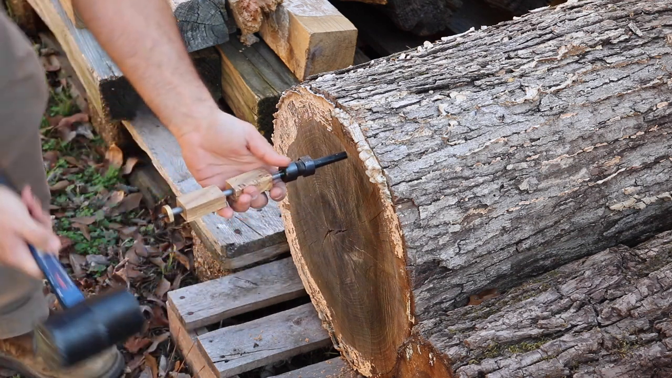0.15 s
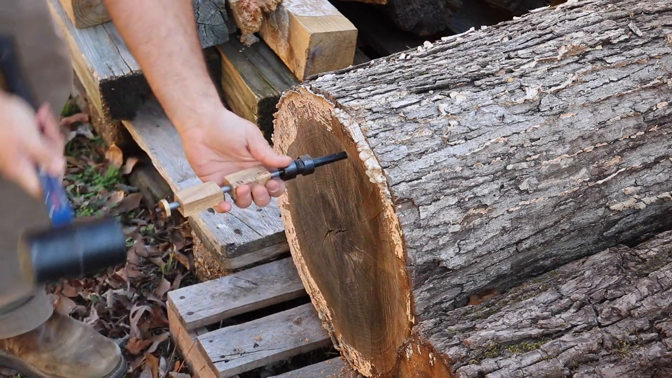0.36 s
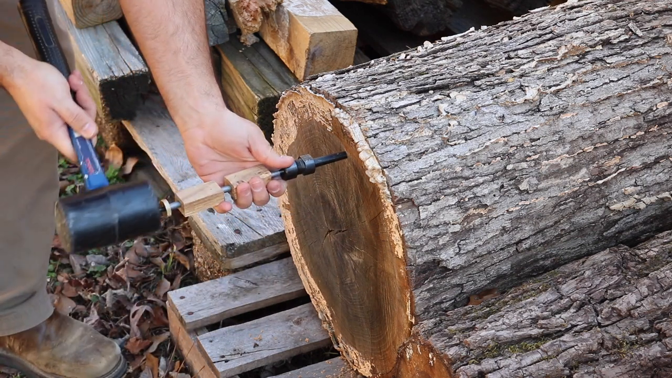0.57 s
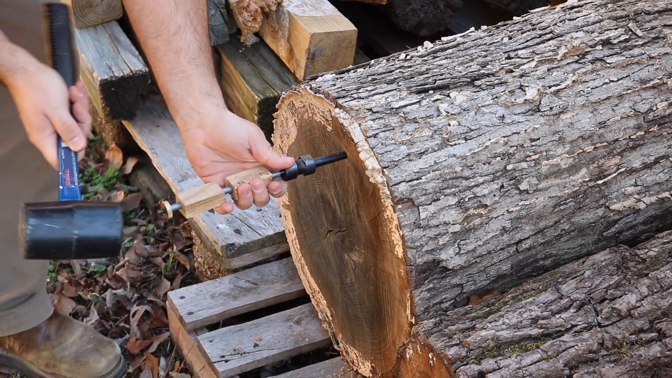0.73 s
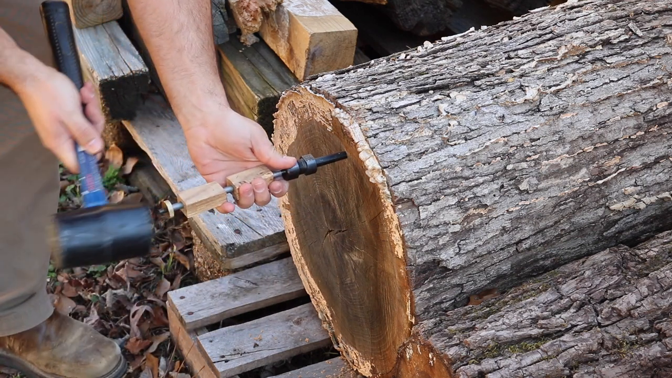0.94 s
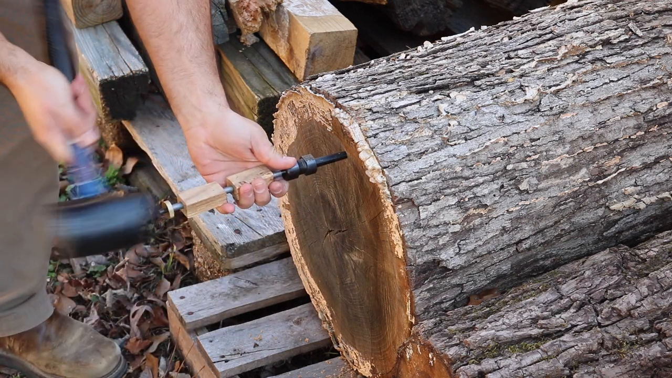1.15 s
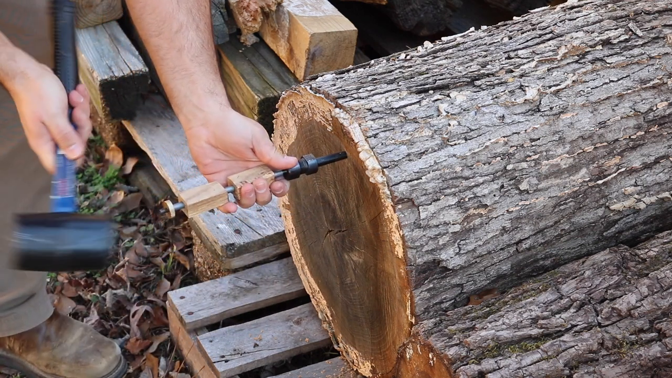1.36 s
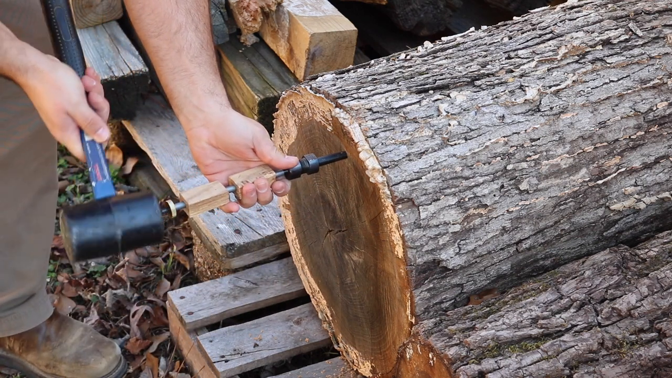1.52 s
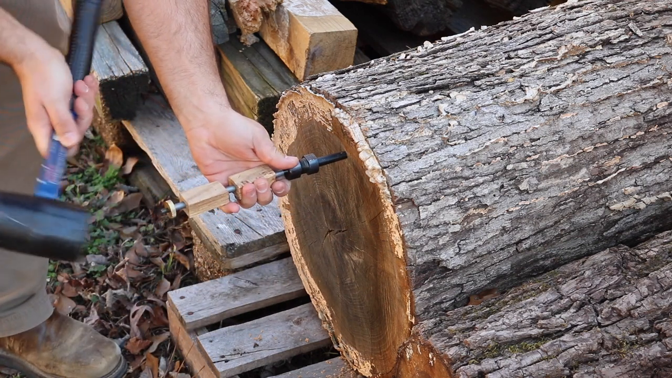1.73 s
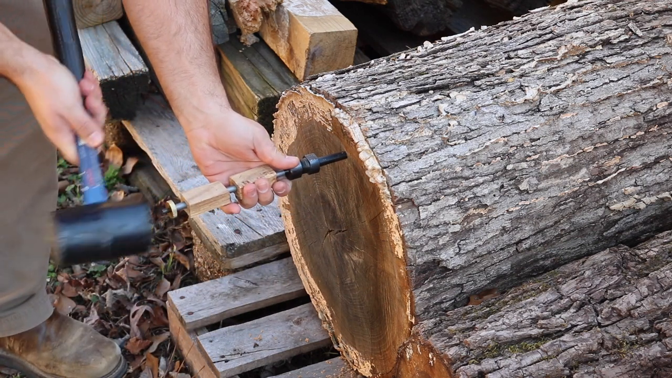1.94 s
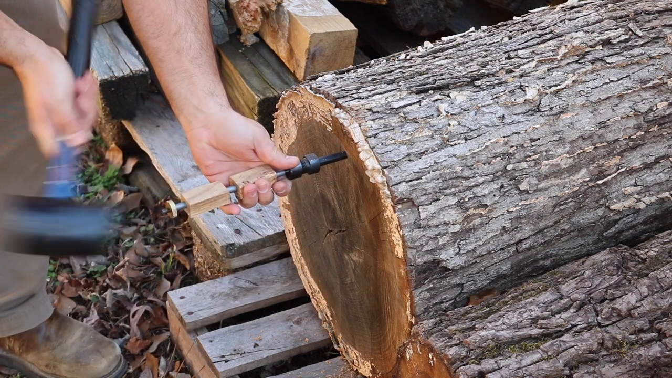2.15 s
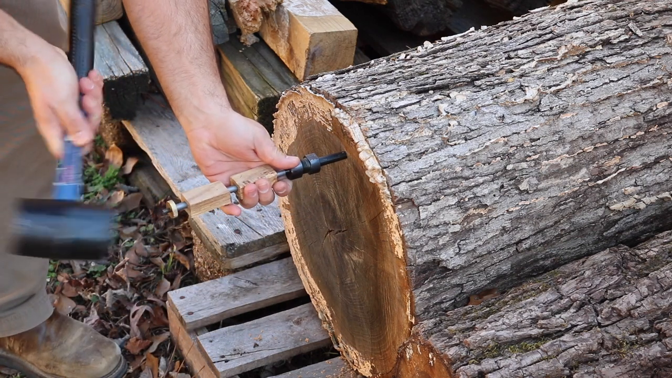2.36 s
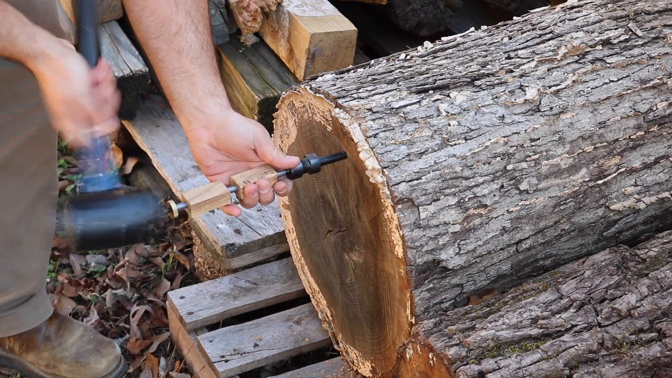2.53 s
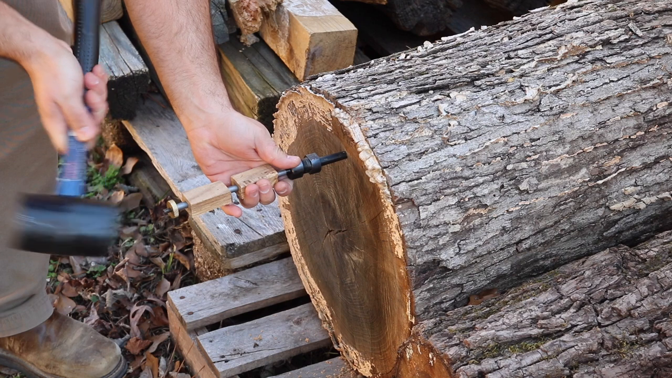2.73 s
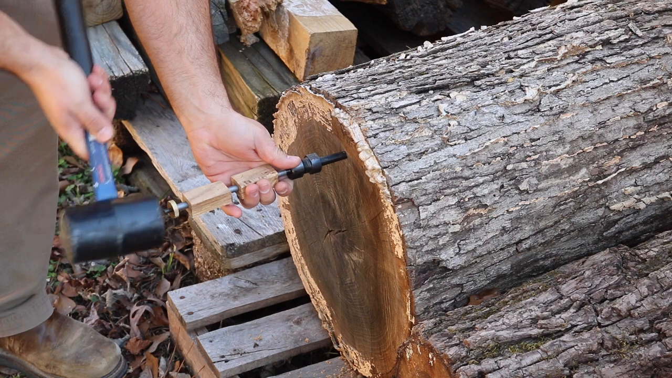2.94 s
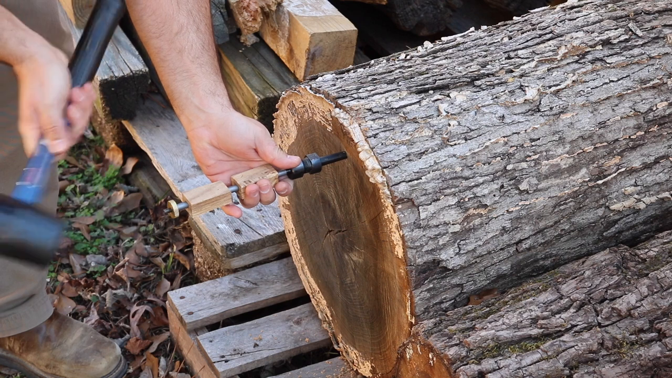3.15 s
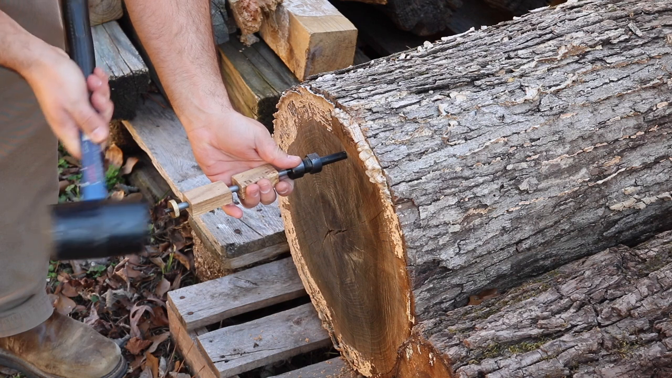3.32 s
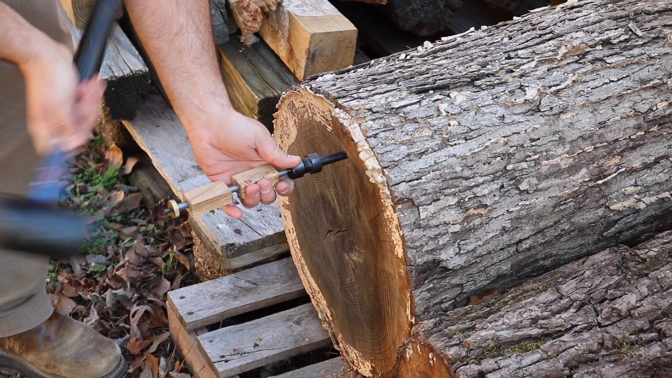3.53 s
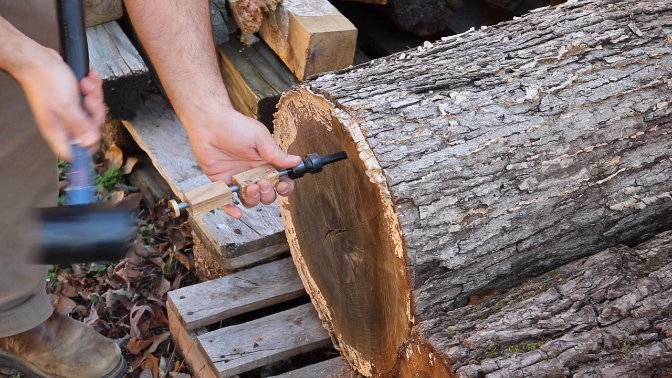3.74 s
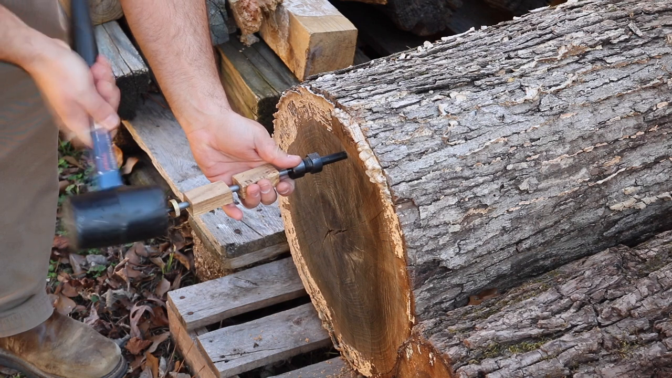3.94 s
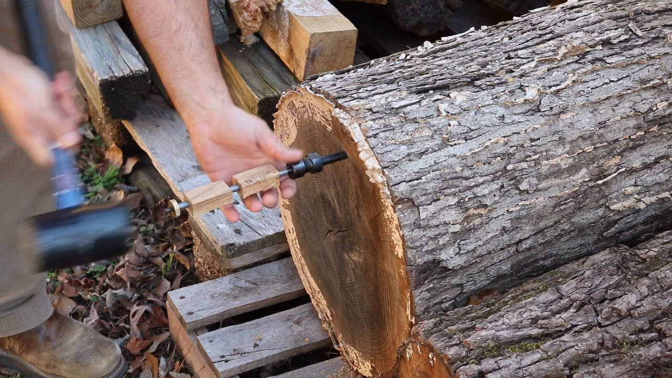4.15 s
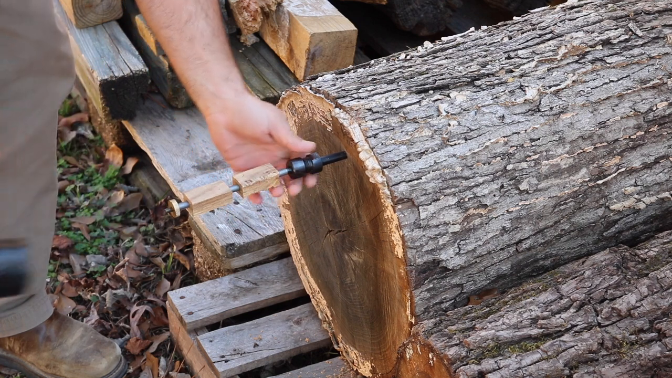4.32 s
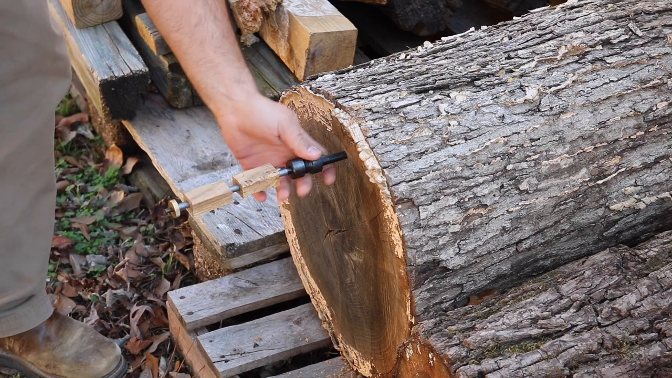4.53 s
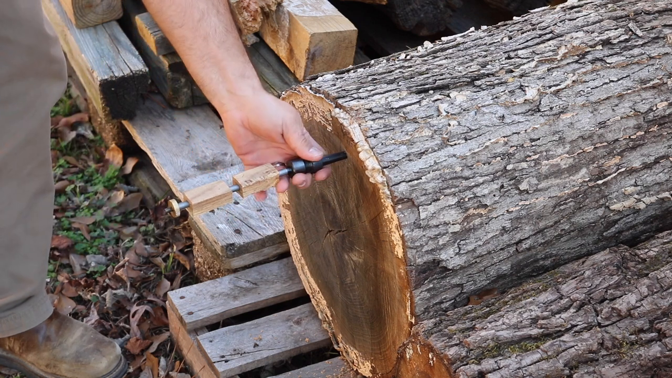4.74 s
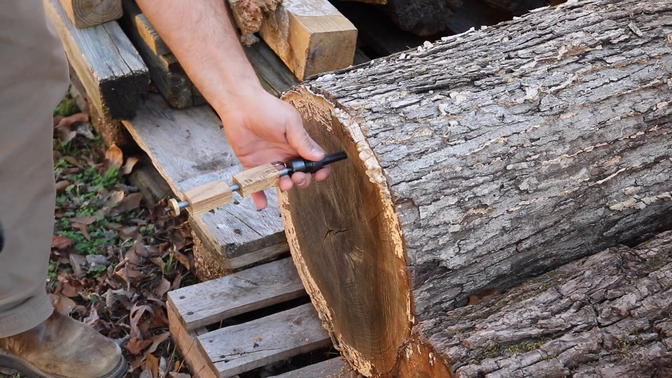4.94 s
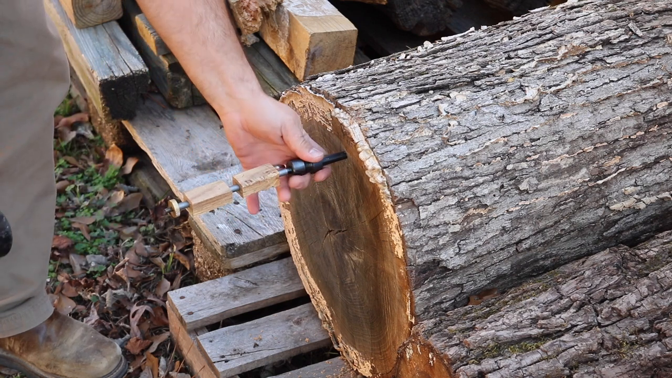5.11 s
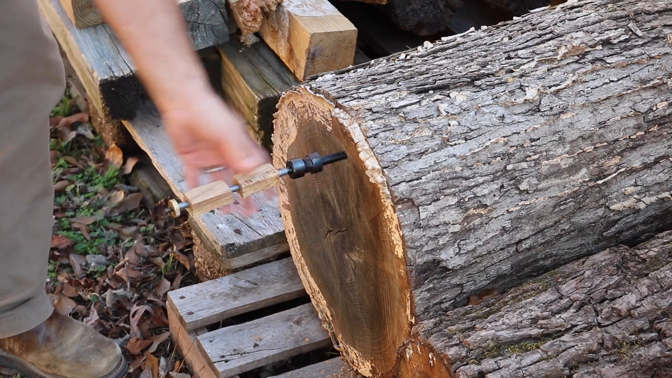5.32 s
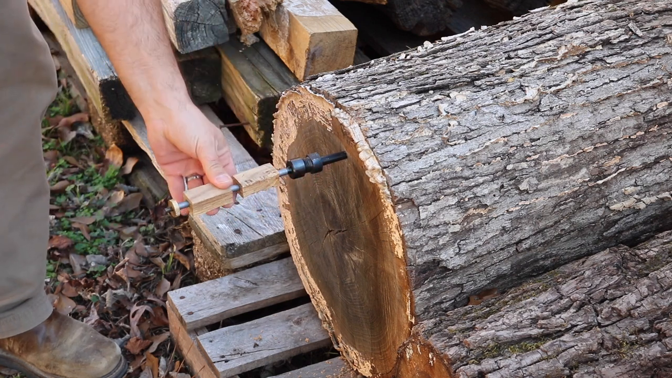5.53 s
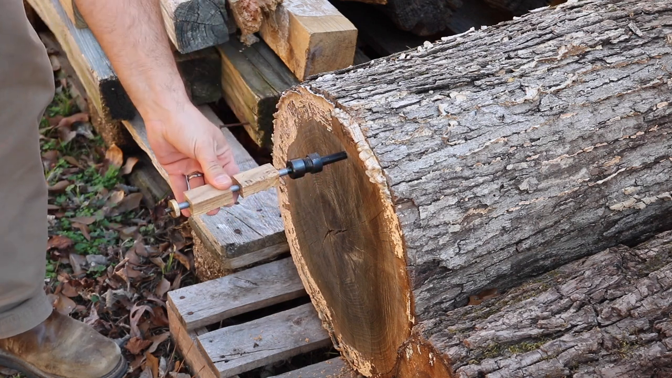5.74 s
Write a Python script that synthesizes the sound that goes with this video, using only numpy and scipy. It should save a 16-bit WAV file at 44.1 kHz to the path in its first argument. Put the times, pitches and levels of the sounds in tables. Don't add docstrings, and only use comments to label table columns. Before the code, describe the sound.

Outdoors, crunching leaves and snapping twigs, then eleven steady mallet knocks drive a steel rod into a log, ending in quiet rustles and faint bird chips.

```python
import sys
import numpy as np
from scipy import signal
from scipy.fft import rfft, irfft
from scipy.io import wavfile
from scipy.ndimage import uniform_filter1d

SR = 44100
rng = np.random.default_rng(int(sys.argv[2]) if len(sys.argv) > 2 else 0)


def to_wav(sig):
    pcm = np.clip(np.atleast_2d(sig), -1, 1) * 32767
    pcm = np.round(pcm).astype(np.int16)
    wavfile.write(sys.argv[1], SR, pcm.T)


def voltage_ratio(decibels):
    exponent = np.asarray(decibels, float) / 20
    return 10 ** exponent


N = 254898


def unit(x):
    return x / np.sqrt(np.mean(x ** 2))


def colour(x, points):
    hz, db = np.transpose(points)
    f = np.maximum(np.arange(len(x) // 2 + 1) * SR / len(x), 1)
    gain = voltage_ratio(np.interp(np.log(f), np.log(hz), db))
    return irfft(rfft(x) * gain, len(x))


def ring(hz, t60, lag=0., length=.5):
    t = np.maximum(np.arange(int(length * SR)) / SR - lag, 0)
    return np.sin(2 * np.pi * hz * t) * 1000. ** (-t / max(t60, .002))


def burst(low_hz, high_hz, t60, length=.5):
    t = np.arange(int(length * SR)) / SR
    band = signal.butter(2, [low_hz, min(high_hz, 18000)], "band", fs=SR, output="sos")
    noise = unit(signal.sosfilt(band, rng.standard_normal(len(t))))
    return noise * 1000. ** (-t / t60)


def add(out, s, sound):
    i = int(s * SR)
    out[i:i + len(sound)] += sound[:N - i]


def walk(rate):
    k = int(SR / rate)
    steps = np.repeat(rng.standard_normal(N // k + 1), k)
    return unit(uniform_filter1d(uniform_filter1d(steps, k), k)[:N])


def body(modes, scatter_db=2.42):
    total = 0
    for hz, db, t60, ms in modes:
        level_chance, pitch_chance = rng.standard_normal(2)
        mode = ring(hz * (1 + pitch_chance / 300), t60, ms / 1000)
        total = total + voltage_ratio(db + scatter_db * level_chance) * mode
    return total


# frequency in Hz, density in dB per Hz.
AIR_SPECTRUM = [(20, -1), (50, -2), (100, 1.5), (200, -5.5), (400, -9), (800, -15.5), (1600, -17.5),
                (2500, -18.5), (3300, -15.5), (4200, -21.5), (8000, -24), (15600, -28.5), (16100, -50)]
# time in seconds, level in dB.
GUST_LEVEL = [(0.0, -62), (0.21, -70), (0.75, -57.5), (1.45, -58), (2.1, -56), (2.4, -63), (3.14, -60),
              (4.0, -69), (4.25, -60), (4.57, -68.5), (5.1, -66.5), (5.78, -58)]


def air():
    s, db = np.transpose(GUST_LEVEL)
    hum = unit(colour(rng.standard_normal(N), AIR_SPECTRUM)) * voltage_ratio(-64 + 0.42 * walk(0.39))
    rumble = [(12, -24), (30, 0), (70, -0.5), (130, -11.5), (300, -41)]
    gust = unit(colour(rng.standard_normal(N), rumble))
    return hum + gust * voltage_ratio(np.interp(np.arange(N) / SR, s, db) - 2.0 + 3.5 * walk(9))


# start in seconds, level in dB, top frequency in Hz.
BIRD_CHIPS = [
    (4.442, -64.5, 6100),
    (4.467, -64, 5930),
    (5.532, -58.5, 6000),
    (5.557, -64.5, 5950),
    (5.638, -70.5, 5800),
    (2.992, -59.5, 6000),
]


def bird():
    out = np.zeros(N)
    u = np.linspace(0, 1, int(.016 * SR))
    for s, db, top_hz in BIRD_CHIPS:
        hz = top_hz * np.interp(u, [0, .3, .55, .68, 1], [.58, .85, 1, .88, .5])
        whistle = np.sin(2 * np.pi * np.cumsum(hz) / SR)
        add(out, s, voltage_ratio(db) * np.sin(np.pi * u) ** .3 * whistle)
    trees = voltage_ratio(-40.0) * burst(5460, 5500, 0.36) + voltage_ratio(-22.5) * burst(2400, 8600, 0.062)
    return out + signal.fftconvolve(out, trees)[:N]


# loudest moment in seconds, level in dB,
# swell and fade in seconds (spanning 20 dB), crispness in dB.
LEAF_STIRS = [(0.019, -56.5, 0.15, 0.074, -3), (.124, -35, 0.0083, 0.087, 2), (0.167, -29, .048, 0.032, -5),
              (.28, -44, 0.11, .11, -5), (0.477, -39, .19, 0.084, -3.5), (0.555, -46, 0.12, 0.0063, -25),
              (.64, -61.5, 0.087, 0.14, -4), (.776, -61, 0.039, 0.11, -20), (1.158, -60, .11, 0.14, -7),
              (1.31, -65.5, 0.075, 0.15, 3), (1.445, -49.5, 0.087, 0.12, -10),
              (1.79, -64, 0.039, 0.044, -10), (1.985, -50.5, 0.016, 0.064, -1),
              (2.075, -65, .012, .08, -21), (2.17, -64, 0.096, 0.5, -11), (2.37, -46, 0.071, 0.09, -3.5),
              (2.74, -74, .11, 0.013, 6.5), (2.87, -58, 0.043, .16, -14), (3.24, -61.5, .08, 0.022, -8),
              (4.103, -54, 0.042, 0.061, -4), (4.59, -62.5, 0.046, 0.22, -9),
              (4.84, -54.5, 0.073, 0.054, -4), (4.98, -56.5, 0.32, 0.17, -8),
              (5.235, -61.5, 0.091, 0.22, -20), (5.445, -62.5, 0.008, 0.066, -9)]
# frequency in Hz, density in dB per Hz.
LEAF_SPECTRUM = [(150, -13.5), (500, -9.5), (1200, -6), (2500, -3.5), (3200, 0.5), (4100, -6.5),
                 (6500, -13.5)]


def rustle():
    t = np.arange(N) / SR
    power = np.zeros((3, N))
    for s, db, swell, fade, crisp_db in LEAF_STIRS:
        away = np.where(t < s, (s - t) / max(swell, .004), (t - s) / max(fade, .004))
        stir = voltage_ratio(db - 20 * np.minimum(away, 5) ** 1.52) ** 2
        power[int(db < -51)] += stir
        power[2] += voltage_ratio(crisp_db - 3.0) ** 2 * stir
    uneven_db = 1.8 * np.minimum(rng.exponential(size=N), 5) + 2.5 * walk(300) + 1.1 * walk(60)
    grains = rng.standard_normal(N) * voltage_ratio(uneven_db)
    low = unit(colour(grains, LEAF_SPECTRUM + [(9000, -34)]))
    light = colour(low, [(500, 4.5), (1300, -1.5), (2300, -0.5)])
    crisp = [(4000, -23), (6000, -1.0), (8000, 3), (12000, -3.5), (15600, -6.5), (16100, -20)]
    high = unit(colour(grains, crisp))
    return voltage_ratio(-1.0) * np.sum(np.sqrt(power) * np.array([low, light, high]), axis=0)


# start in seconds, peak in dB, frequency in Hz, treble in dB.
TWIG_SNAPS = [(0.1664, -12, 3060, -7.5), (0.2189, -33, 3190, -3), (0.2543, -17.5, 1860, -14),
              (0.2926, -23, 2260, -15), (0.3047, -24, 2560, -9), (0.326, -38, 2590, -6),
              (0.36, -26, 4340, -13), (0.3649, -21.5, 2620, -13), (0.392, -27, 2600, -13),
              (0.4374, -24.5, 3050, -13), (0.5826, -46, 3450, -7), (0.6438, -48.5, 3220, 5),
              (0.668, -48, 3370, -1), (0.77, -37.5, 2540, -13), (0.7973, -39, 3760, -3),
              (0.827, -43, 2560, -10)]
# start in seconds, peak in dB, frequency in Hz, treble in dB.
GRIT_TICKS = [(0.884, -44, 1820, -15.5), (0.9832, -46, 2125, -21), (1.3206, -39, 3520, -23),
              (1.4194, -28, 3120, -24), (1.719, -49, 3260, -2), (1.7963, -44, 3300, -7),
              (1.9787, -36, 3670, -7), (2.0107, -36.5, 3400, -22), (2.0726, -33.5, 2690, -28),
              (2.1674, -38.5, 2790, -17), (2.194, -44.5, 3260, -21), (2.4144, -36, 3930, -19),
              (2.7325, -43, 1550, -6), (3.1068, -46, 1520, -31), (3.4189, -35, 2140, -8),
              (3.92, -44, 2290, -14), (4.098, -25, 3200, -14.5), (4.14, -43, 3102, -2),
              (4.3034, -35, 2514, -14.5), (4.817, -52, 2560, -18), (4.83, -32, 2680, -28),
              (4.841, -39, 4420, -30), (4.8957, -36.5, 3830, -14), (4.9794, -32, 3050, -15),
              (5.0544, -48, 2680, -9), (5.1692, -24.5, 2900, -26), (5.2318, -40, 3340, -25),
              (5.3127, -45.5, 3560, -8.5), (5.4448, -37, 3500, -23)]


def ticks():
    out = np.zeros(N)
    for table, t60 in [(TWIG_SNAPS, 0.0098), (GRIT_TICKS, 0.012)]:
        for s, db, hz, treble_db in table:
            snap = burst(4000, 14000, t60 / 2, length=.05)
            rough = burst(hz * .75, hz * 1.3, t60, length=.05) * .45
            tone = 0.83 * ring(hz, t60, length=.05)
            add(out, s, voltage_ratio(db - 7.0) * (tone + rough + voltage_ratio(treble_db + 7.0) * snap))
    return out


# start in seconds, peak in dB, frequency in Hz, T60 in seconds.
DULL_BUMPS = [(0.015, -41.5, 193, 0.14), (0.033, -38, 980, 0.032), (0.188, -29.5, 98, 0.065),
              (3.138, -38.5, 214, 0.11), (4.624, -39, 105, 0.067), (5.104, -35, 1230, 0.016),
              (5.113, -42, 970, 0.063), (5.133, -41.5, 273, 0.097), (5.148, -37, 490, 0.025),
              (5.16, -38, 90, 0.13)]


def bumps():
    out = np.zeros(N)
    for s, db, hz, t60 in DULL_BUMPS:
        tone = 0.32 * ring(hz, t60, length=.2)
        rough = 0.42 * burst(hz * .5, hz * 1.58, t60, length=.2)
        add(out, s, voltage_ratio(db - 1.5) * (tone + rough))
    return out


# delay in seconds, level in dB.
WALL_ECHOES = [
    (.027, -33),
    (.046, -33),
    (.0545, -21.5),
    (.058, -29),
    (.115, -33),
    (.158, -34),
]


def wall_echoes(direct):
    walls = np.zeros(SR // 4)
    for s, db in WALL_ECHOES:
        add(walls, s, voltage_ratio(db) * np.hanning(5) / 2)
    walls = colour(walls, [(100, -3), (200, 3), (500, -6), (1000, -3), (3500, 0), (5000, -8), (12000, -30)])
    return signal.fftconvolve(direct, walls)[:N]


# low and high edge in Hz, level in dB, T60 and rise in seconds.
YARD_WASH = [(251, 715, -43, 0.49, 0.025), (725, 1220, -44.5, 0.71, 0.1), (1410, 3000, -47.5, 0.75, 0.055),
             (2800, 7000, -52.5, 0.83, 0.04)]
# frequency in Hz, level in dB, T60 in seconds, arrival in ms.
LOG_SWAY = [(96.4, -32, 0.44, 20.17), (110.4, -42.5, 0.69, 32), (174.3, -32, 0.49, 7.6),
            (155.8, -36.5, 0.6, 17.63), (208.7, -34, 0.5, 9.8), (239, -38, 0.31, 14.22)]


def sway_and_wash(thump_db):
    t = np.arange(SR // 2) / SR
    late = voltage_ratio(thump_db) * body(LOG_SWAY) * (1 - np.exp(-t / 0.043))
    for low_hz, high_hz, db, t60, rise in YARD_WASH:
        late = late + voltage_ratio(db) * burst(low_hz, high_hz, t60) * (1 - np.exp(-t / rise))
    return late


# frequency in Hz, level in dB, T60 in seconds, arrival after first touch in ms.
THUMP_MODES = [(460, -45, 0.038, 3.04), (319.8, -38, 0.24, 9.85), (569, -15, 0.036, 1.97),
               (880, -11.5, 0.013, 0.28)]
# as for the thump, Hz, dB, seconds, ms.
SHOVE_MODES = [(219, -7.5, 0.028, 1.12)]
# as for the thump, Hz, dB, seconds, ms.
WOOD_MODES = [(791, -15, .065, 7.8), (900, -18, .055, 8.0)]
# as for the thump, Hz, dB, seconds, ms.
GRIP_MODES = [(1097, -18, 0.05, 2.96), (1194, -20, 0.057, 3.13), (726, -19, 0.043, 3.27)]
# as for the thump, Hz, dB, seconds, ms.
FACE_MODES = [(1480, -14, 0.029, 2.347), (1670, -19.5, 0.031, 2.545)]
# as for the thump, Hz, dB, seconds, ms.
KNOCK_MODES = [(2085, -6, 0.014, 2.906), (2198, -7, 0.019, 2.782), (2000, -35, 0.12, 10)]
# as for the thump, Hz, dB, seconds, ms.
STEEL_MODES = [(2574, -19.5, 0.044, 1.536), (2600, -18.5, 0.041, 1.387), (3050, -15.5, 0.021, 1.802),
               (3560, -24.5, 0.04, 1.78), (4350, -25.5, 0.025, 0.34), (5320, -33.5, 0.022, 1.6),
               (7140, -26, 0.026, 0.23), (7880, -36.5, 0.031, 0.5)]
# as for the thump, Hz, dB, seconds, ms.
TOUCH_MODES = [(3380, -5.5, .006, .5)]
# as for the thump, Hz, dB, seconds, ms.
COLLAR_MODES = [(6050, -25, 0.028, 1.7), (5470, -19, 0.0099, 0.243)]


def log_ring(pitch, slack_db):
    damping = 1 - 0.008 * slack_db
    modes = [(hz * pitch, db, t60 * damping, ms) for hz, db, t60, ms in WOOD_MODES]
    return body(modes) - voltage_ratio(-7.5) * ring(885, 0.0073, lag=0.006)


def chatter(slack_db, fizz_db):
    t = np.arange(SR // 2) / SR
    pressed = 1 / (1 + (t / .008) ** 3)
    rattle = voltage_ratio(-21.5) * burst(1400, 3800, 0.09) * pressed
    crack = voltage_ratio(slack_db - 31.0) * burst(4300, 10140, 0.029)
    fizz = voltage_ratio(fizz_db - 31) * burst(10500, 15500, .02)
    return rattle + crack + fizz


def strike(pitch, thump_db, steel_db, square_db, slack_db):
    log = voltage_ratio(-2 + 0.11 * square_db) * log_ring(pitch, slack_db)
    thump = voltage_ratio(thump_db) * (body(THUMP_MODES) - body(SHOVE_MODES))
    grip = voltage_ratio(-1.3 + 0.86 * square_db) * body(GRIP_MODES)
    face = voltage_ratio(-3.5 + 0.59 * slack_db) * body(FACE_MODES)
    knock = voltage_ratio(square_db) * body(KNOCK_MODES)
    steel = voltage_ratio(steel_db) * (body(STEEL_MODES, 1.06) + body(TOUCH_MODES))
    collar = voltage_ratio(0.25 + .65 * square_db) * body(COLLAR_MODES)
    rough = chatter(slack_db, 2.9 + 0.84 * square_db) + voltage_ratio(-33.0) * burst(390, 4000, 0.11)
    return thump + log + grip + face + knock + steel + collar + rough


# start in seconds, peak in dB, steel in dB, squareness in dB, slack in dB.
MALLET_BLOWS = [(0.5479, -23.5, -2.5, -31, 4), (0.899, -24.5, -1.5, -5.5, 3.5), (1.2425, -23, 5.5, 1, 10.5),
                (1.583, -20, 3, 3, 12), (1.9344, -17.5, 4, 1.5, 11), (2.2707, -14, -8.5, -3, 6.5),
                (2.6114, -13.5, -6, -5.5, 6), (2.9513, -14.5, -5.5, 1, 3.5), (3.302, -11.5, -8, -4.5, 2),
                (3.6533, -14.5, 0, 4, -7), (4.0199, -11.5, -3, -1, -10)]


def blows():
    direct, late = np.zeros(N), np.zeros(N)
    for s, db, steel_db, square_db, slack_db in MALLET_BLOWS:
        pitch = .91 if s < 1.4 else 1.008
        thump_db = -0.61 + 0.28 * square_db
        add(direct, s, voltage_ratio(db + 6.5) * strike(pitch, thump_db, steel_db, square_db, slack_db))
        add(late, s, voltage_ratio(db + 8.5) * sway_and_wash(thump_db))
    low_cut = signal.butter(2, 105, "high", fs=SR, output="sos")
    return signal.sosfilt(low_cut, direct + wall_echoes(direct)) + late


def scene():
    mid = air() + bird() + rustle() + ticks() + bumps() + blows()
    spread = [(30, -48), (60, -50), (125, -54), (250, -40), (400, -55), (700, -55), (1000, -34),
              (2000, -35), (4000, -32), (8000, -27), (12000, -25)]
    side = colour(np.imag(signal.hilbert(mid)), spread)
    hiss = [(25, 3.5), (130, 9.5), (2000, -6.5), (10000, 0.0), (15600, 6), (16000, -26)]
    side = side + voltage_ratio(-77) * unit(colour(rng.standard_normal(N), hiss))
    return np.array([mid + side, mid - side])


def band_limit(x):
    return signal.sosfilt(signal.butter(12, 16850, fs=SR, output="sos"), x)


def record(dry):
    top = signal.butter(8, 16300, fs=SR, output="sos")
    return band_limit(signal.sosfilt(top, dry))


dry = scene()
out = record(dry)
to_wav(out)
```